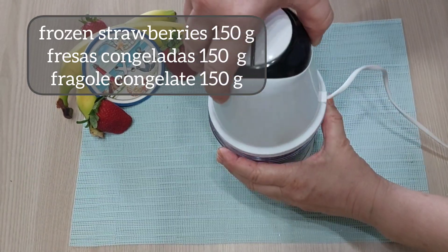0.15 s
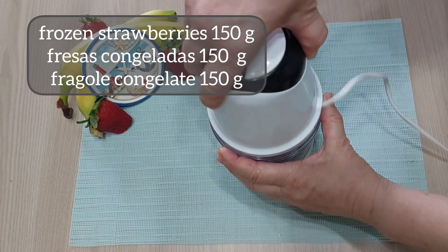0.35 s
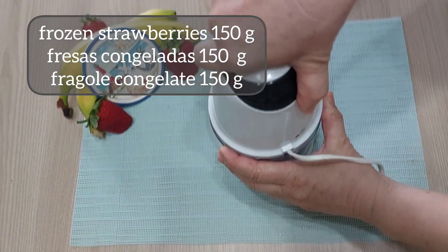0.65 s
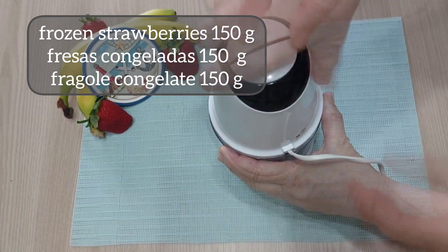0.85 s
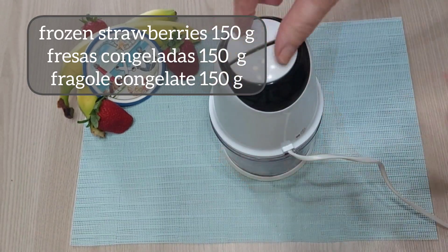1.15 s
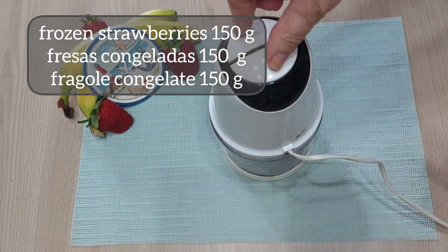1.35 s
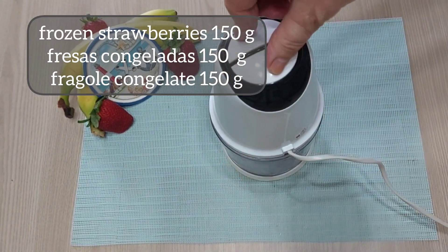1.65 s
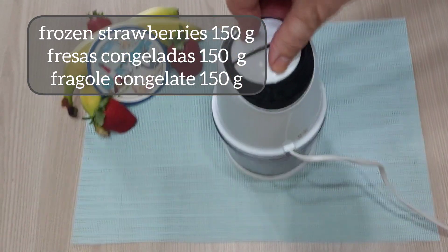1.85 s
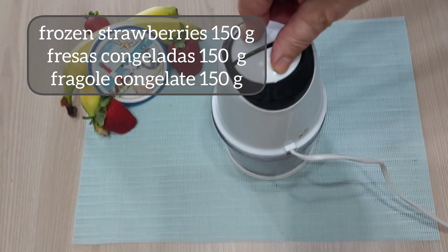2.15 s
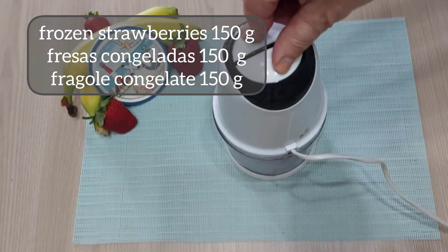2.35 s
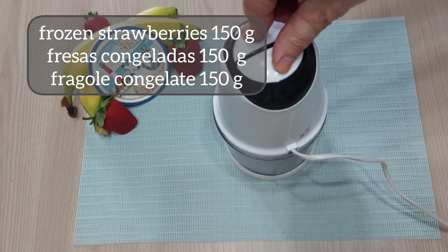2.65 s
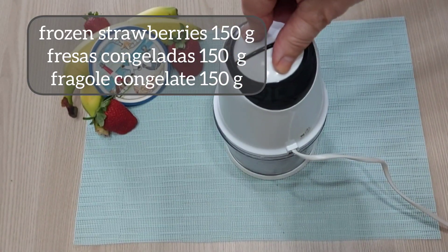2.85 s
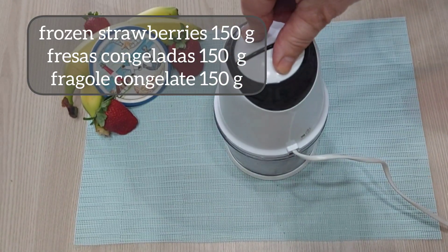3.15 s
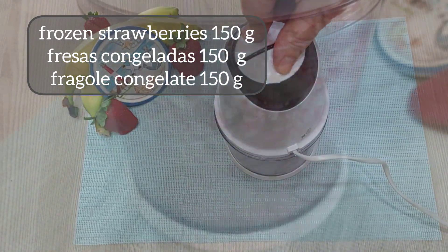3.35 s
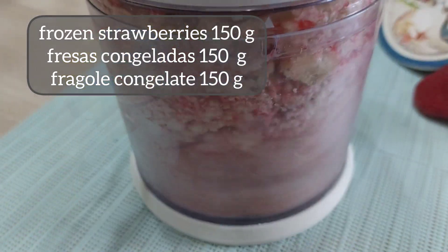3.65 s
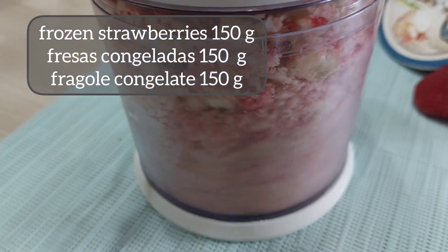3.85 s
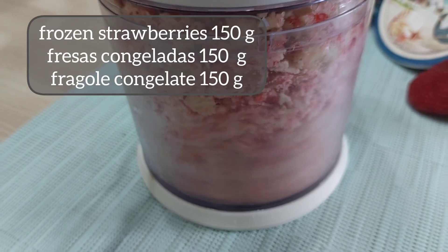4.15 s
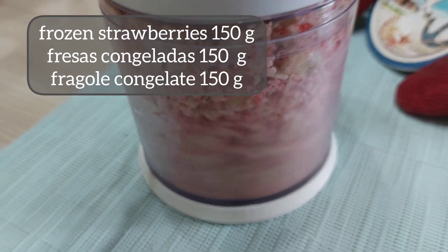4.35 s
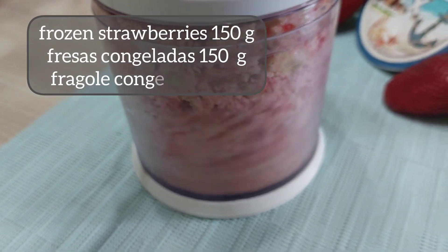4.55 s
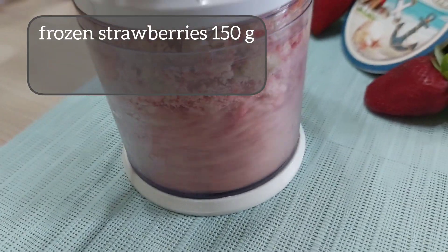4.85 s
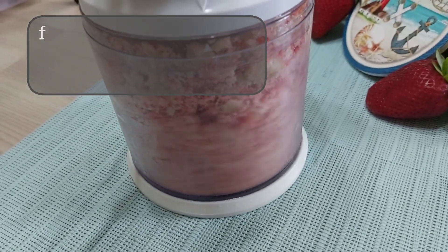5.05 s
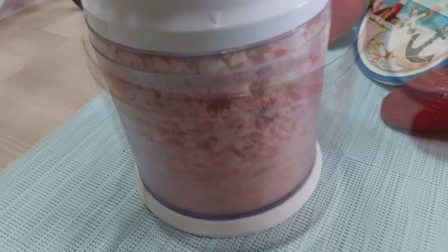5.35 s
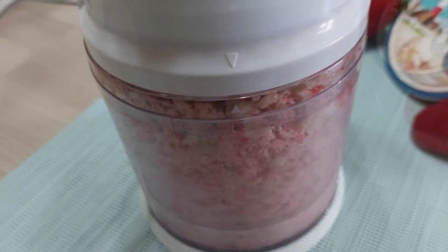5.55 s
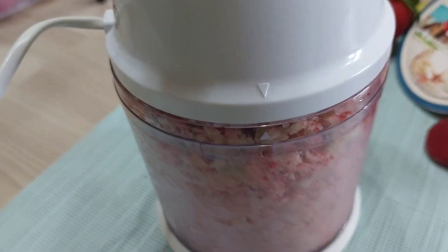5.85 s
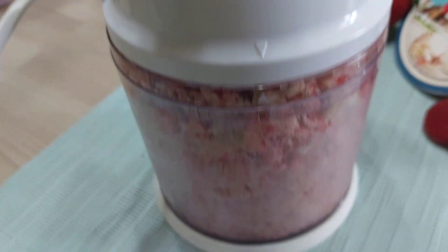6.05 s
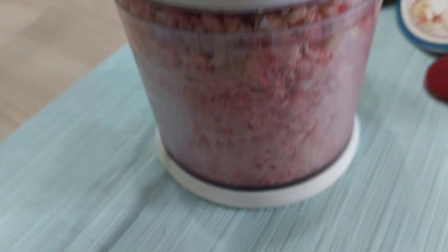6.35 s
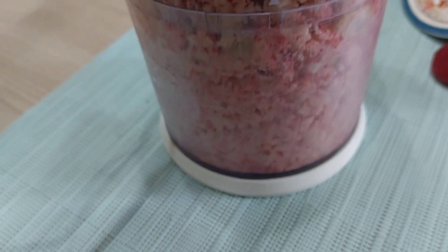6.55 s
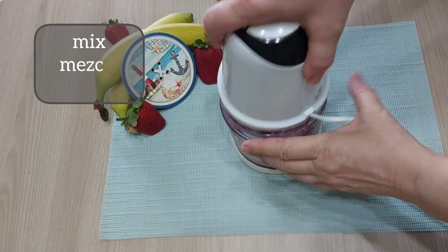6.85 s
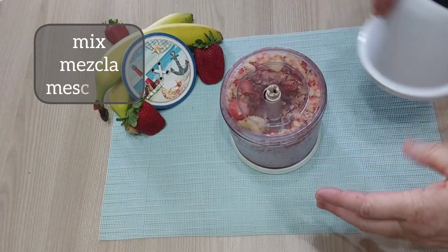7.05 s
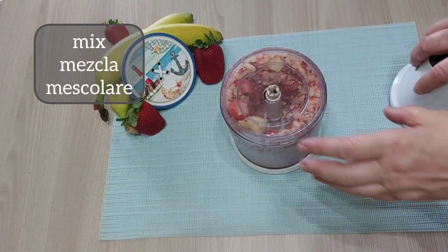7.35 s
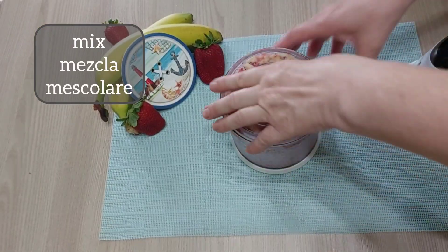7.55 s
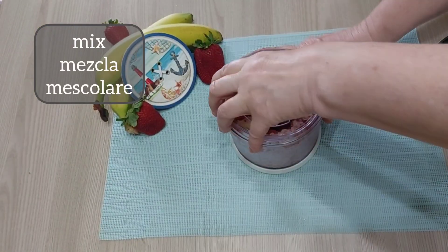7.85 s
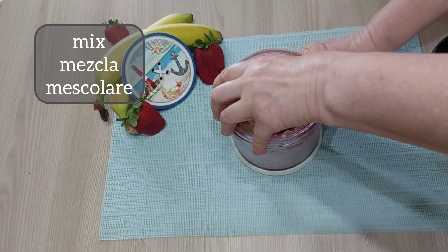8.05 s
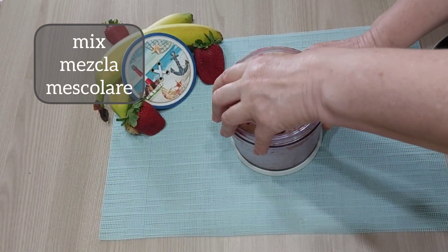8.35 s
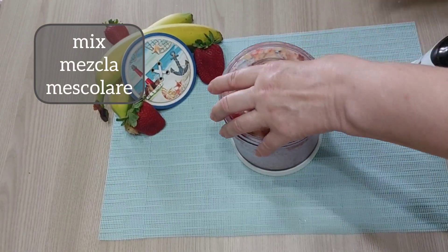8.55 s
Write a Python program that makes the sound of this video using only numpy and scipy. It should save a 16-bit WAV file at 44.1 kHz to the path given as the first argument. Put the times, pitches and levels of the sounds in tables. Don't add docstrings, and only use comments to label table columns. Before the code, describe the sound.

In a hard-surfaced kitchen, a plastic motor head is knocked onto a bowl with loud clacks and low thuds that ring and fade out. After near silence, the chopper suddenly runs, frozen lumps cracking and rattling, then settling to a smoother grind with a rising gear whine. It cuts off; faint scrapes, a soft set-down and a small lid click follow. Close stereo microphone.

```python
import sys
import numpy as np
from scipy import signal
from scipy.fft import rfft, irfft, next_fast_len
from scipy.io import wavfile
from scipy.ndimage import uniform_filter1d

SR = 44100
rng = np.random.default_rng(int(sys.argv[2]) if len(sys.argv) > 2 else 0)


def volts(x):
    e = np.asarray(x, float) / 20
    return 10 ** e


def store_wav(level_fs):
    pcm = np.round(np.clip(np.atleast_2d(level_fs), -1, 1) * 32767)
    wavfile.write(sys.argv[1], SR, pcm.T.astype(np.int16))


N = 382768
T = np.arange(N) / SR
SIZE = next_fast_len(N + SR)
F = np.maximum(np.arange(SIZE // 2 + 1) * SR / SIZE, 1)
CUTS_S = (1.725, 6.737, 6.768)
# (start [s], end [s])
STAGES = [
    (3.3, 3.7),
    (5.2, 5.7),
]


def shape(points, hz=F):
    f, v = np.transpose(points)
    return np.interp(np.log(hz), np.log(f), v)


def spectrum(x, size=SIZE):
    return rfft(x.astype(np.float32), size)


def wave(x, size=SIZE):
    return irfft(x.astype(np.complex64), size)[..., :N].astype(float)


def filt(x, gain):
    return wave(spectrum(x) * gain)


def unit(x):
    return x / np.sqrt(np.mean(x ** 2))


def band(lo_hz, hi_hz, f=F):
    cube = f * f * f
    below_hi = 1 / (1 + (cube / hi_hz ** 3) ** 2)
    below_lo = 1 / (1 + (cube / lo_hz ** 3) ** 2)
    return np.sqrt(np.abs(below_hi - below_lo))


def causal(points):
    c = irfft(np.log(volts(shape(points, np.maximum(np.arange(257) * SR / 512, 1)))))
    c[1:256] *= 2
    c[257:] = 0
    return irfft(np.exp(rfft(c)))


def pan(db):
    return volts(np.array([db, -db]) / 2)


def add(out, s, x):
    i = int(s * SR)
    out[..., i:i + x.shape[-1]] += x[..., :N - i]


def walk(rate):
    held = np.repeat(rng.standard_normal(int(rate * N / SR) + 2), 4)
    smooth = uniform_filter1d(uniform_filter1d(held, size=4), size=4)
    return unit(np.interp(4 * rate * T, np.arange(len(held)), smooth))


def ports(gain=1, size=SIZE):
    # (frequency [Hz], correlation [1])
    likeness = [(100, 0.94), (300, 0.98), (600, 0.57), (2000, 0.29), (5000, 0.21), (12000, 0.041)]
    c = np.clip(shape(likeness, F[::SIZE // size][:size // 2 + 1]), 0, .999)
    mid, side = spectrum(rng.standard_normal((2, size)), size) * gain
    both = mid * np.sqrt(1 + c) + side * np.sqrt(1 - c) * np.array([[1], [-1]])
    return wave(both, size) / np.sqrt(2)


def ports_short():
    a, b, c = rng.standard_normal((3, SR // 50))
    return np.array([a + 0.6 * b, a + 1.3 * c]) / 1.11


def ring(hz, t60, length=.8, phase=0.):
    t = T[:int(length * SR)]
    return np.sin(2 * np.pi * hz * t + phase) * 1000. ** (-t / np.maximum(t60, .004))


def body(modes, scatter_db):
    out = 0
    for hz, db, t60 in modes:
        out = out + volts(db + scatter_db * rng.standard_normal()) * rng.choice([-1, 1]) * ring(hz, t60)
    return out


def octaves():
    step = 8
    size = SIZE // step
    noise, f = rfft(ports(size=size)), F[::step][:size // 2 + 1]
    centres_hz = 44 * 2. ** np.arange(9)
    return [(hz, irfft(noise * band(hz / np.sqrt(2), hz * np.sqrt(2), f), size)[:, :SR]) for hz in centres_hz]


def room(x, bands, stretch, gap_s=0.0025):
    # (frequency [Hz], t60 [s])
    room_t60 = [(60, 0.5), (250, 0.89), (1000, 0.49), (3000, .6), (7000, 0.43), (14000, 0.34)]
    t = T[:SR]
    tail = sum(b * 1000. ** (-t / (stretch * shape(room_t60, hz))) for hz, b in bands)
    tail = tail * (1 - np.exp(-t / gap_s))
    return filt(x, spectrum(tail / np.sqrt(np.sum(tail ** 2) / 2)))


def kitchen():
    # (frequency [Hz], density [dB per Hz])
    rumble_colour = [(15, -36.5), (25, -13), (49, -9), (75, -5), (104, -16), (116, -5.5), (136, -22.5),
                     (341, -28), (392, -33), (915, -43.5), (1950, -47), (2340, -50), (6000, -60.5),
                     (7800, -91.5), (13200, -120)]
    level_db, hiss_db = -72, -90.0
    hum = volts(-9.5 + 2 * walk(1.9)) * np.sin(2 * np.pi * 101 * T)
    rumble = unit(ports(volts(shape(rumble_colour)))) * volts(1.2 * walk(8.6)) + hum
    faint = (T > STAGES[1][1]) & (T < CUTS_S[1])
    return volts(level_db) * rumble * pan(7.1)[:, None] * volts(-8 * faint) + volts(hiss_db) * rng.standard_normal((2, N))


def rustle():
    # (loudest [s], rise [s], fall [s], level [dB], brightness
    # [dB])
    strokes = [(.09, 0.52, 0.1, -68.5, -21.5), (.25, 0.11, .02, -68, -15.5), (6.85, .2, .11, -70, -15.5),
               (7.15, .105, .115, -57.5, -16.5), (7.075, 0.069, .04, -65, -6),
               (7.32, 0.048, 0.12, -61, -23.5), (7.55, 0.18, 0.23, -83, 2), (8.16, .015, 0.093, -71, 14),
               (8.3, .03, 0.056, -75.5, -0.5), (8.148, .004, 0.0064, -73, 26.5), (8.672, .02, .02, -85, 5)]
    # (frequency [Hz], density [dB per Hz])
    cloth = [(88, -45.5), (150, -23.5), (249, -2.5), (504, -7.5), (649, -5), (1660, -3.5), (1790, -5),
             (3100, -9.5), (16000, -43)]
    swish = [(2060, -38.5), (3500, -7), (4050, -5), (5670, -15.5), (7800, -2.5), (10300, -7.5), (13600, -1),
             (16000, -11)]
    stroke_db = 23.5
    drag = ports() * volts(1.9 * walk(300) + .6 * walk(60))
    dull = filt(drag, band(1, 5500) * volts(shape(cloth)))
    bright = filt(drag, volts(shape(swish)))
    low, high = 0, 0
    for s, rise, fall, db, bright_db in strokes:
        away = np.interp(T, [s - 3 * rise, s, s + 3 * fall], [3, 0, 3])
        stroke = volts(db - stroke_db * away ** 2)
        low = low + stroke
        high = high + volts(bright_db) * stroke
    return low * unit(dull) + high * unit(bright)


def thuds():
    # (time [s], peak [dB], pitch [Hz], ring length [s], table boom
    # [dB])
    blows_on_table = [(0.004, -49.5, 350, 0.082, 5.5), (0.265, -23, 242, 0.067, 5),
                      (0.292, -20.5, 238.6, 0.22, -5.5), (0.5906, -13.5, 243.7, 0.035, -4.5),
                      (0.613, -19.5, 237.9, 0.16, -0.5), (0.6872, -7, 252.3, 0.095, -5.5),
                      (0.753, -21.5, 239.3, 0.16, -6), (6.775, -57.5, 105.6, 0.12, 1.5),
                      (6.857, -48.5, 121, 0.083, -1.5), (7.26, -48.5, 332.5, 0.053, -5),
                      (7.299, -31, 129, 0.04, -2.5), (7.314, -31, 255, 0.036, -8.5),
                      (7.334, -33, 112, 0.083, -7), (7.36, -44, 108.7, 0.1, -6.5),
                      (7.409, -48.5, 164.6, 0.1, -3.5), (7.448, -52.5, 105.7, 0.073, -4.5),
                      (7.602, -56.5, 335, 0.11, -2), (8.146, -28, 240.5, 0.13, -10),
                      (8.405, -52, 336.6, 0.092, -4.5), (8.502, -62, 118.4, 0.075, 3.5),
                      (6.771, -58, 402, .14, 6),
        (6.875, -52, 560, .07, -3),
    ]
    # (frequency [Hz], gain [dB])
    table_colour = [(30, -21.5), (60, -4), (150, 5.5), (200, 0), (240, 3.5), (300, -0.5), (450, -8),
                    (800, -26.5), (3000, -66)]
    out, shudder, blows, t = np.zeros(N), np.zeros((2, N)), np.zeros(N), T[:int(.4 * SR)]
    wood = unit(ports(volts(shape(table_colour))))
    for s, db, hz, length, table_db in blows_on_table:
        turn = 2 * np.pi * hz * t
        rock = np.sin(turn) + .18 * np.sin(.64 * turn) + 0.092 * np.sin(1.42 * turn)
        add(out, s, volts(db - 7.0) * rock * 1000. ** -(t / length) ** 2 * (1 - np.exp(-t / 0.00034)))
        i = rng.integers(N - len(t))
        boom = wood[:, i:i + len(t)] * 1000. ** (-t / 0.41) * (1 - np.exp(-t / 0.0031))
        add(shudder, s, volts(db + table_db - 9.5) * boom)
        add(blows, s, volts(np.array([db + table_db + 29.5])))
    return (out + shudder) * pan(-1.5)[:, None], filt(blows, volts(shape(table_colour)))


def ticks():
    # (time [s], peak [dB], ring [Hz], crack minus peak [dB])
    contacts = [(0.08, -47, 1140, -24.5), (0.114, -46, 1700, -33), (0.2594, -30, 1510, -9.5),
                (0.267, -8.5, 2570, -8.5), (.289, -16, 2600, -3.5), (.292, -7.5, 1770, -10),
                (0.544, -40.5, 1703, -13), (.545, -40.5, 2650, -16), (0.5817, -7, 2697, -23.5),
                (.59, -2, 2764, -13.5), (.615, -13.5, 2493, -10), (.683, -15.5, 1685, 1.5),
                (.921, -46, 1590, -3), (0.989, -48, 3104, -12), (1.025, -43.5, 1694, -14.5),
                (1.035, -49.5, 1683, -1), (1.081, -53, 1172, -18), (6.795, -58, 3200, -18.5),
                (6.827, -52, 1485, -19.5), (6.863, -42.5, 1780, -18), (6.867, -41, 1804, -21.5),
                (6.869, -33.5, 1141, -33), (7.261, -49, 1210, -17), (7.311, -45.5, 2820, -11.5),
                (7.341, -54, 2774, -12.5), (7.366, -56, 2900, -12), (7.447, -62, 1780, -20),
                (7.298, -52, 902, -15), (8.147, -42, 1214, 0), (8.283, -35.5, 1233, -30),
                (8.304, -54.5, 1452, -25), (8.317, -53, 1601, -26), (8.332, -57, 1327, -25),
                (8.498, -74, 1235, -5.5)]
    # (peak [dB], t60 [s])
    ring_s = [(-44, 0.013), (-38.5, 0.017), (-7.5, .008)]
    # (frequency [Hz], left minus right [dB])
    ring_pan = [(1150, 5.5), (1700, 2.5), (2600, -6.5)]
    # (peak [dB], share [dB])
    shell_db = [(-45, -2), (-7.5, -12)]
    # (frequency [Hz], gain [dB])
    plastic = [(300, -7.5), (750, -3), (2500, 1.5), (5000, -4), (8000, -10), (12000, -16), (16000, -15)]
    # (mode [Hz], level [dB], t60 [s])
    blade = [(1155, -45, .4), (2500, -42.5, .4), (2890, -47, .3), (3730, -43, .25), (3830, -34, .38),
             (3905, -40, .3), (5043, -46, .25), (6560, -52, .25)]
    head = [(2580, -3.5, .1), (2710, 0, .12), (2840, -3, 0.18), (3467, -9, .1), (3830, -5, .14),
            (5093, -14.5, .15)]
    rim = [(1140, -1, .22), (1780, -4.5, .12), (2720, -1.5, .04)]
    # (time [s], level [dB])
    head_blows = [
        (.269, -42),
        (.592, -31),
        (.686, -50),
        (7.311, -65),
        (7.341, -71),
        (7.366, -70),
    ]
    shell_hz, blade_s, rim_s = (1160, 1760, 2680), .69, 6.87
    tone, crack, blows, t = np.zeros((2, N)), np.zeros((2, N)), np.zeros((2, N)), T[:SR // 50]
    for s, db, hz, crack_db in contacts:
        t60 = np.interp(db, *np.transpose(ring_s))
        sides = pan(shape(ring_pan, hz))[:, None]
        add(crack, s, volts(db + crack_db + 2.5) * ports_short() * np.exp(-t / 0.0022) * sides)
        shell = sum(ring(f, 800 / f * t60, .1, 6 * rng.random()) for f in shell_hz)
        near = ring(hz, t60, .1) + volts(np.interp(db, *np.transpose(shell_db))) * shell
        onset = (1 - np.exp(-T[:len(near)] / 0.0011)) ** 2
        add(tone, s, volts(db + 5.5) * near * onset * sides)
        add(blows, s, volts(np.array([[db], [db + crack_db]])))
    add(tone, blade_s, body(blade, 0.63) * (1 - np.exp(-T[:int(.8 * SR)] / 0.01)))
    for s, db in head_blows:
        add(tone, s, volts(db) * body(head, 1.5))
    add(tone, rim_s, volts(-58) * body(rim, .7))
    far = filt(volts(9.5) * blows[0], band(340, 2000))
    far = far + filt(volts(15.5) * blows[1], band(3900, 30000) * volts(shape(plastic)))
    return tone + signal.lfilter(causal(plastic), 1, crack), far + volts(-13.5) * tone.mean(0)


def whine():
    # (time [s], mesh [Hz], level [dB])
    mesh = [(5.15, 3240, -74), (5.34, 3270, -66), (5.41, 3284, -60.5), (5.77, 3327, -56.5),
            (5.9, 3300, -58), (6.1, 3332, -56), (6.48, 3410, -59), (6.73, 3510, -59)]
    # (multiple of mesh [1], level [dB])
    partials = [(.312, -7), (.629, -4), (1, 1), (1.422, -11), (1.566, -14), (1.994, -17), (2.34, -19)]
    s, hz, db = np.transpose(mesh)
    waver = 1 + 0.0025 * walk(25) + .002 * walk(6)
    turn = 2 * np.pi * np.cumsum(np.interp(T, s, hz) * waver) / SR
    tones = 0
    for k, k_db in partials:
        tones = tones + volts(k_db + 0.77 * walk(17)) * np.sin(k * turn + (k > 1) * 1.1 * walk(70))
    tones = tones * pan(14.1)[:, None]
    onset = np.interp(T, [5.1, 5.3], [0, 1])
    hum = volts(-68) * np.sin(2 * np.pi * 100 * T)
    return onset * (np.sqrt(2) * volts(np.interp(T, s, db)) * tones + hum)


def labour():
    # (time [s], centre [Hz], level [dB])
    mesh = [(1.8, 2470, -71.5), (2.2, 2402, -63), (2.42, 2385, -59.5), (2.6, 2620, -59.5), (2.8, 2900, -60),
            (3.0, 3020, -59.5), (3.2, 2904, -61), (3.45, 2772, -66.5), (3.85, 2550, -62), (4.1, 2760, -63),
            (4.5, 2620, -67), (4.9, 2900, -65), (5.1, 2760, -67), (5.3, 3200, -72)]
    s, hz, db = np.transpose(mesh)
    turn = 2 * np.pi * np.cumsum(np.interp(T, s, hz)) / SR
    smear = [walk(280) * np.sin(k * turn) + walk(280) * np.cos(k * turn) for k in (1, 2)]
    return volts(np.interp(T, s, db, -130, -130) + 1.4 * walk(30)) * (smear[0] + volts(-7) * smear[1])


def swarm(rate, spread_db, tail_s):
    knocks = (rng.random(N) < rate / SR) * volts(spread_db * np.minimum(rng.exponential(size=N), 4.5))
    return unit(signal.lfilter([1], [1, -np.exp(-1 / (tail_s * SR))], knocks))


def bowl(points, modes):
    return volts(shape(points) + sum(db / (1 + (2 * (F - hz) / width) ** 2) for hz, width, db in modes))


def rattle():
    # (time [s], boom [dB])
    load = [(1.72, -92), (1.75, -62), (1.79, -47.5), (2.41, -52), (2.56, -48.5), (3.25, -55), (3.86, -50),
            (4.39, -50), (5.71, -55), (6.75, -51.5)]
    # (frequency [Hz], density [dB per Hz])
    above = [(18, -58), (30, -57.5), (127, -7), (199, -14), (245, -7.5), (287, -12), (336, -11),
             (1070, -22.5), (1910, -14), (2120, -16.5), (4530, -25), (7270, -29.5), (9710, -36),
             (13000, -28.5), (16000, -37)]
    beside = [(18, -54), (30, -29), (199, -2), (239, 4), (415, -13), (889, -6), (1280, -16), (1810, -13.5),
              (2120, -17.5), (2350, -12), (4420, -22.5), (5590, -21), (8740, -30.5), (13700, -32),
              (16000, -33)]
    crumbs = [(18, -65), (30, -70), (84, -21.5), (252, -2.5), (415, -18), (600, -15.5), (988, -19.5),
              (1070, -20.5), (1160, -22), (1810, -15), (3060, -22.5), (3400, -18.5), (3870, -24.5),
              (6720, -23.5), (16000, -37)]
    # (centre [Hz], width [Hz], height [dB])
    modes_above = [(242.4, 35, 10.5), (1860, 170, 7.5), (2550, 410, 1.5), (5423, 180, 3.5),
                   (7500, 630, 7.5), (13600, 900, 4.5)]
    modes_beside = [(242, 130, -5.5), (620, 33, 1.5), (1805, 470, 12), (2340, 150, 4.5), (5400, 350, 2.5),
                    (12400, 600, 5)]
    modes_crumbs = [(165, 70, 5), (100, 25, 4), (4300, 500, -3), (5250, 200, 3), (6650, 200, 3),
                    (15300, 1500, 6)]
    # (rattle [dB], ice hiss [dB], left minus right [dB], lowest boom [Hz])
    mixes = [
        (-54, -57.5, -0.6, 51),
        (-55.5, -54, 1.5, 70),
        (-53.5, -55.5, 0.2, 120),
    ]
    usual_db, follow = -53, 0.49
    crash_db, crash_s = 6, 0.14
    boom_db = np.interp(T, *np.transpose(load))
    busy_db = follow * (boom_db - usual_db) + crash_db * np.exp(-np.abs(T - 1.77) / crash_s)
    boom, busy = volts(boom_db), volts(busy_db)
    first, second = (np.interp(T, stage, [0, 1]) for stage in STAGES)
    coarse, grind = swarm(750, 4.3, 0.00255), swarm(1900, 3.3, 0.0045)
    views = ((1 - first, coarse, bowl(above, modes_above)),
             (first - second, coarse, bowl(beside, modes_beside)),
             (second, grind, bowl(crumbs, modes_crumbs)))
    out = 0
    for (share, force, colour), (rattle_db, hiss_db, pan_db, low_hz) in zip(views, mixes):
        sound = spectrum(ports() * (0.65 + force)) * colour
        layers = (((low_hz, 550), boom),
                  ((550, 3600), busy * volts(rattle_db)),
                  ((3600, 30000), busy * volts(hiss_db)))
        for edges, gain in layers:
            layer = unit(wave(sound * band(*edges)))
            out = out + np.sqrt(np.clip(share, 0, 1)) * gain * layer * pan(pan_db)[:, None]
    return out


def lumps():
    # (time [s], peak [dB])
    big = [(1.7702, -42), (1.8745, -45), (2.0918, -43), (2.1725, -38), (2.2708, -41), (2.3813, -44),
           (2.5906, -41.5), (2.7299, -43.5), (2.7518, -41.5), (2.8129, -39.5), (2.8279, -38.5),
           (2.869, -42.5), (3.087, -34.5), (3.3084, -41.5), (3.5463, -43), (3.7381, -42.5), (3.7546, -38),
           (3.913, -44), (4.2333, -45), (4.4855, -38), (4.6743, -39.5), (4.8049, -38.5), (5.166, -44.5),
           (5.185, -41), (5.5204, -46.5)]
    chips_db, chips_s = -46.5, (1.76, 5.2)
    wall_db, lump_pan_db = -50, (0, 5)
    out, t = np.zeros((2, N)), T[:SR // 50]
    chips = [(np.interp(a, [0, 1], chips_s), chips_db + 4.5 * (b - .5)) for a, b in rng.random(size=(45, 2))]
    for s, db in big + chips:
        crack = signal.lfilter([1, 0, -.8], 1, ports_short()) * np.exp(-t / .0012)
        wall = ring(1936, 0.055, .02, 6 * rng.random()) + 1.76 * ring(2556, 0.014, .02, 6 * rng.random())
        pan_db = np.interp(s, STAGES[0], lump_pan_db) + 3 * rng.standard_normal()
        hit = volts(db - 4.0) * crack + volts(wall_db + 2.7 * rng.standard_normal()) * wall
        add(out, s, hit * pan(pan_db)[:, None])
    return out


def knocks():
    # (time [s], peak [dB], pitch [Hz])
    dull_knocks = [(1.75, -44, 953), (1.769, -38.5, 2855), (1.834, -35.5, 1826), (1.911, -40.5, 1828),
                   (1.949, -38.5, 1878), (2.021, -39, 1935), (2.09, -39.5, 2360), (2.119, -41.5, 1956),
                   (2.157, -37, 1878), (2.204, -40, 1850), (2.324, -44, 1900), (2.342, -40.5, 1850),
                   (2.434, -42.5, 1901), (2.48, -40, 1890), (2.526, -41, 1886), (2.596, -42.5, 1899),
                   (2.667, -42, 1840), (2.694, -41, 1880), (2.717, -40.5, 1850), (2.868, -39.5, 1890),
                   (2.939, -40, 1885), (2.985, -40, 1882), (3.066, -41.5, 1884), (3.145, -41.5, 1893),
                   (3.28, -40, 1830), (3.651, -43, 641), (3.744, -40, 686), (3.786, -38, 619),
                   (3.965, -41, 816), (4.009, -40.5, 608), (4.151, -41, 701), (4.206, -39.5, 1750),
                   (4.276, -37, 1850), (4.318, -40.5, 1746), (4.354, -42, 1722), (4.418, -42.5, 932),
                   (4.443, -38, 872), (4.536, -41.5, 2360), (4.611, -41, 1868), (4.675, -39.5, 826),
                   (4.952, -42, 852), (5.032, -43.5, 2370), (5.112, -39.5, 2575), (5.359, -42.5, 574)]
    out = np.zeros(N)
    for s, db, hz in dull_knocks:
        side_modes = ring(hz * 1.2, 0.024, .04) + ring(hz * 0.494, 0.024, .04)
        add(out, s, volts(db - 2.5) * (ring(hz, 0.04, .04) + .5 * side_modes))
    return out


def chopper():
    return (rattle() + lumps() + knocks() + whine() + labour()) * ((T > 1.72) & (T < 6.75))


def fader():
    (a, b, c), half = CUTS_S, .005
    one, two, three = 4, -2.5, 7.5
    start_s, end_s, depth_db = .7, 1.316, -31
    fade = depth_db * np.clip((T - start_s) / (end_s - start_s), 0, 1) ** 4
    on = lambda s: np.clip((T - s + half) / (2 * half), 0, 1)
    silence_db = -70 * (on(b) - on(c))
    return volts((1 - on(a)) * (one + fade) + (on(a) - on(b)) * two + silence_db + on(c) * three)


def scene():
    (hits, hits_far), (low, table), machine, bands = ticks(), thuds(), chopper(), octaves()
    machine = (machine + room(volts(-11.5) * machine.mean(0), bands, 0.75)) * (T < 6.75)
    far, late = hits_far + table, T > 4
    wet = room(far * ~late, bands, 1.09)
    wet = wet + room(far * late + volts(-24) * hits.mean(0) * late, bands, 0.51)
    return (kitchen() + rustle() + low + hits + machine + wet) * fader()


def top_cut(x):
    return signal.sosfilt(signal.butter(12, 15950, fs=SR, output="sos"), x)


def record(dry):
    # (frequency [Hz], left leads by [rad])
    port_phase = [(50, 0), (1200, .5), (2800, .4), (3700, 3), (8000, 8), (16000, 16)]
    near = filt(dry[1], np.exp(-1j * shape(port_phase)))
    beside = np.interp(T, [3.3, 3.7, 6.75, 6.76], [0, 1, 1, 0])
    delayed = np.roll(dry[1], 13)
    right = near * np.sqrt(1 - beside) ** 1.5 + delayed * np.sqrt(beside) ** 1.5
    x = filt(np.array([dry[0], right]), band(42, 40000))
    return top_cut(np.tanh(x))


dry = scene()
out = record(dry)
store_wav(out)
```